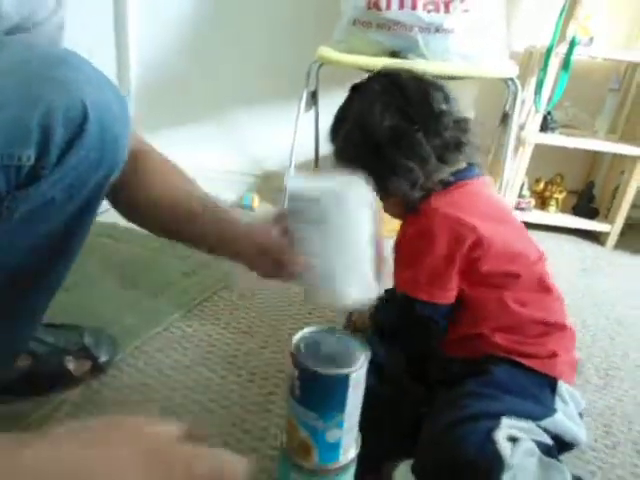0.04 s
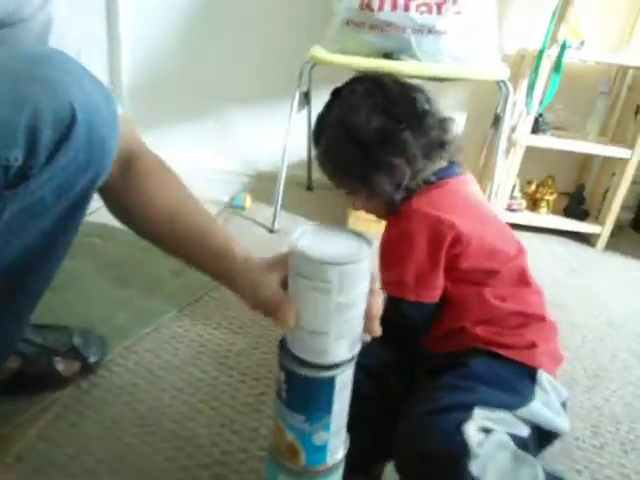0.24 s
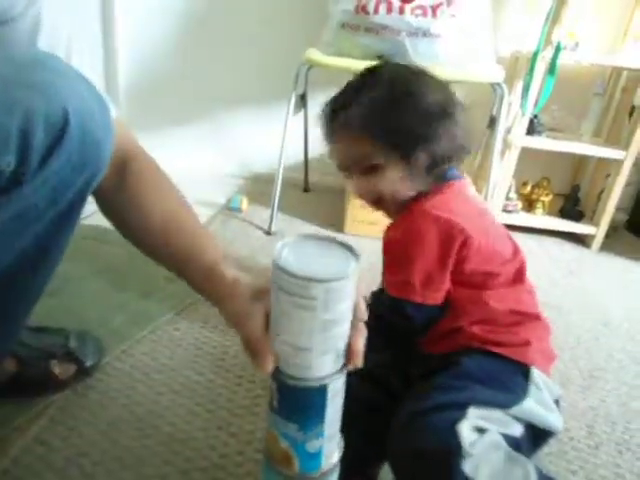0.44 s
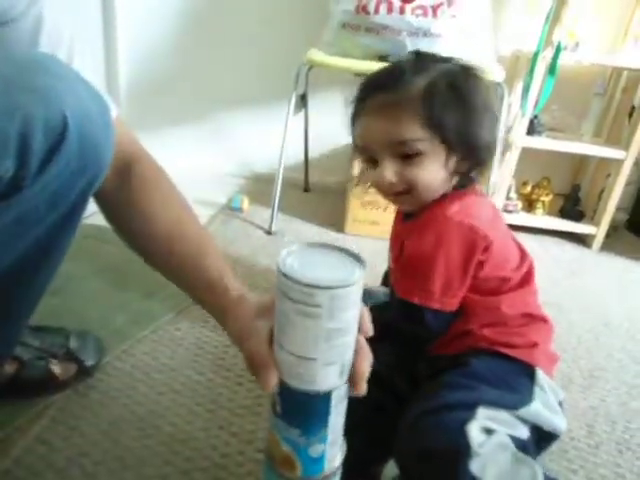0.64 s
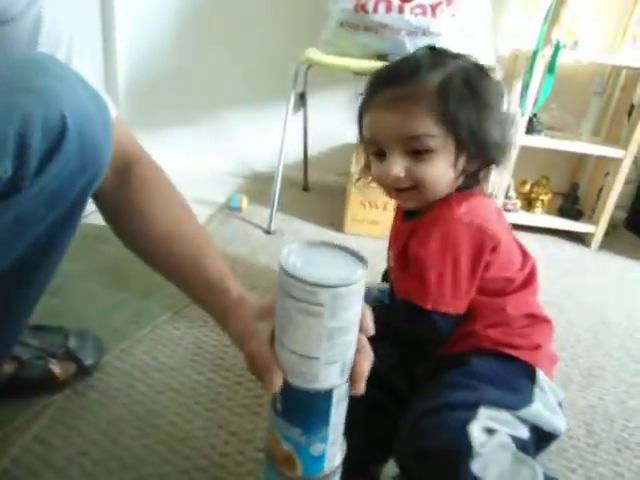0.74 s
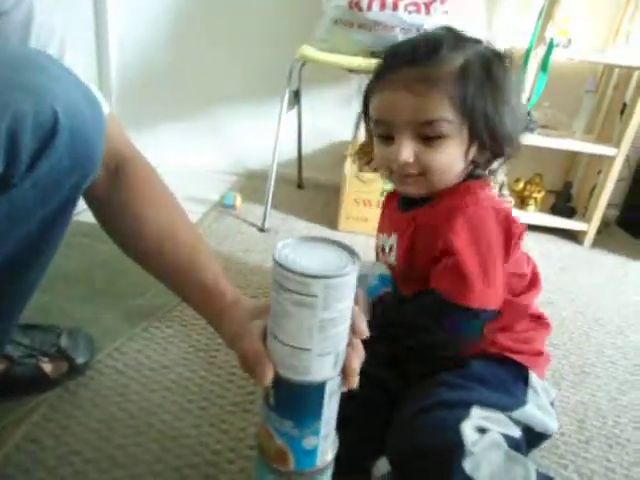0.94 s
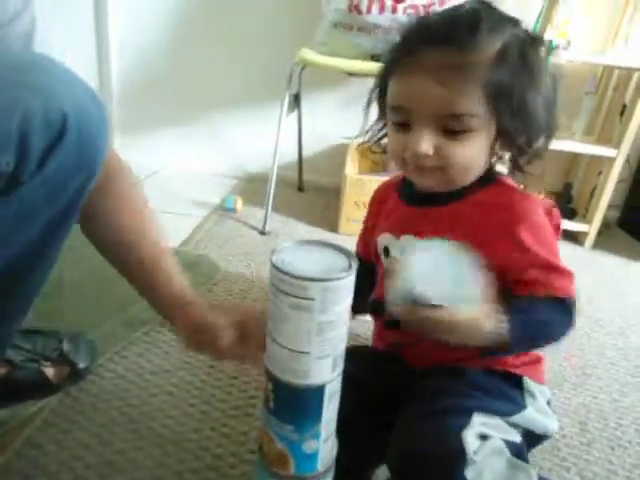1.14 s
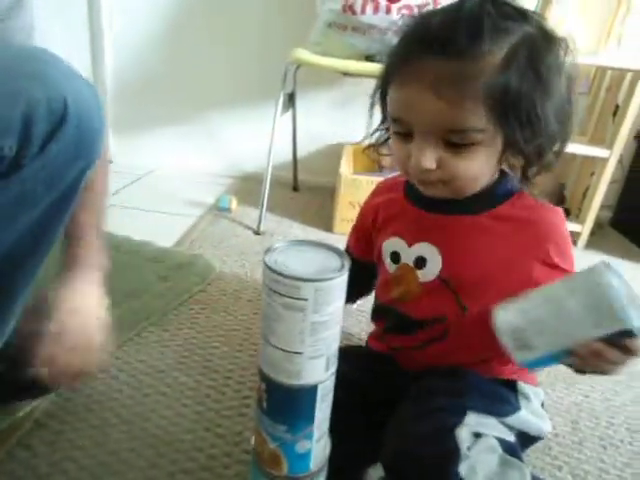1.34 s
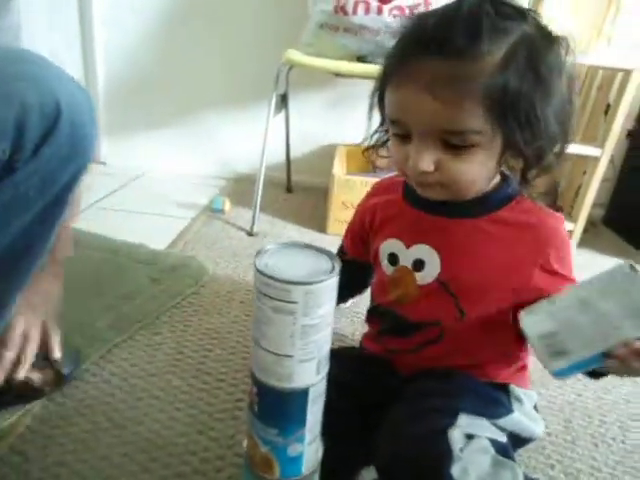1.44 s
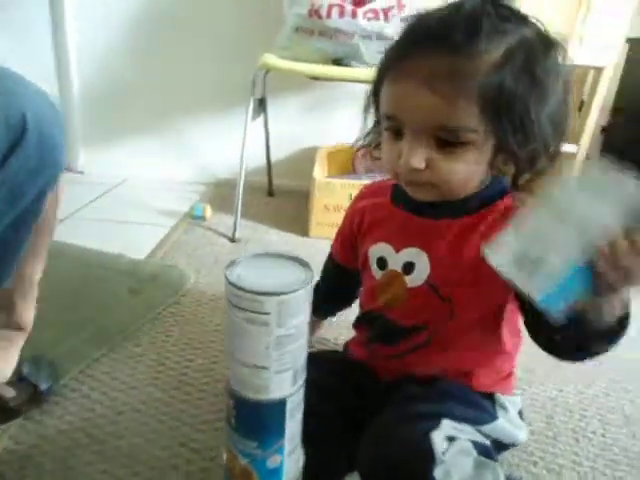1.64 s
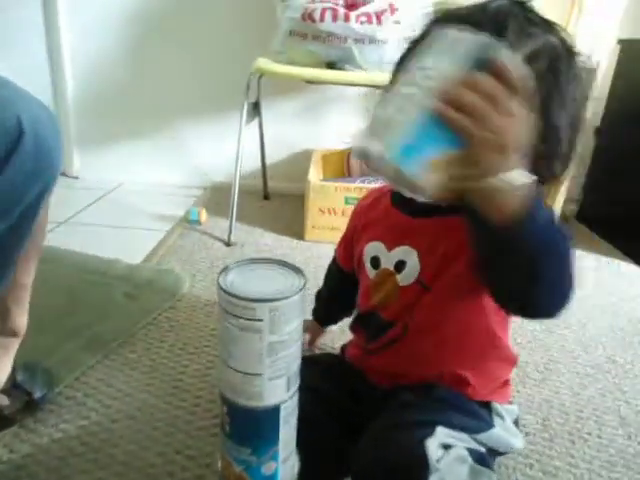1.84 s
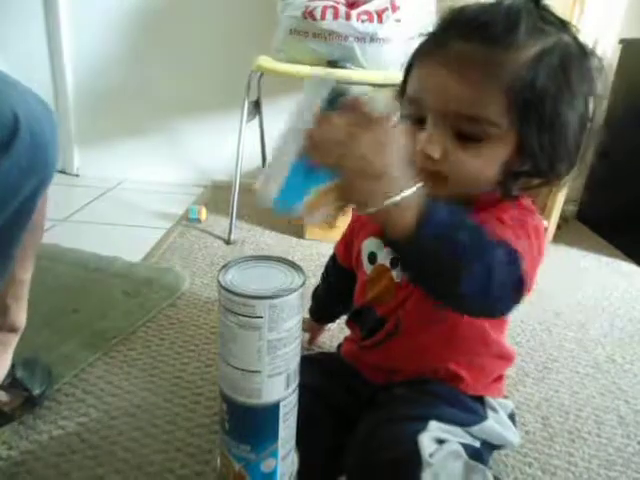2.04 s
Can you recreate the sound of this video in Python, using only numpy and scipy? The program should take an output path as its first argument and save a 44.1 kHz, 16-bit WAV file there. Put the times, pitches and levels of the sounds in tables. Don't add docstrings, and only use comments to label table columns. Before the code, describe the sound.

Tin can set hard on tin can: one clanking blow, short rattle, dull settling knock, low hum

```python
import sys
import numpy as np
from scipy import signal
from scipy.fft import rfft, irfft
from scipy.io import wavfile
from scipy.ndimage import uniform_filter1d

SR = 44100
rng = np.random.default_rng(int(sys.argv[2]) if len(sys.argv) > 2 else 0)


def int16_out(signal):
    q = np.round(np.clip(np.atleast_2d(signal).T, -1, 1) * 32767)
    wavfile.write(sys.argv[1], SR, q.astype(np.int16))


def gain_from_db(level_db):
    decades = np.asarray(level_db, float) / 20
    return 10 ** decades


N = 92610


def evened(x):
    return x / np.sqrt(np.mean(x ** 2) + 1e-20)


def read(points, hz):
    f, value = np.transpose(points)
    return np.interp(np.log(hz + 1), np.log(f + 1), value)


def add(mix, s, sound):
    part = mix[round(s * SR):][:len(sound)]
    part += sound[:len(part)]


def resonate(x, hz, width):
    r = np.exp(-np.pi * width / SR)
    c = r * np.cos(2 * np.pi * hz / SR)
    return 2 * (1 - r) * signal.lfilter([1, -c], [1, -2 * c, r * r], x + 1e-18)


def coloured(points, patchy_db):
    spectrum = rfft(rng.standard_normal(N)) * gain_from_db(read(points, np.fft.rfftfreq(N, 1 / SR)))
    s = signal.stft(irfft(spectrum, N), nperseg=1024)[2]
    patches = uniform_filter1d(rng.standard_normal(s.shape), 10, 0)
    patches = evened(uniform_filter1d(patches, 5, 1))
    return evened(signal.istft(s * gain_from_db(patchy_db * patches), nperseg=1024)[1][:N])


def choke(s, t60):
    return gain_from_db(np.clip(-60 * (np.arange(N) / SR - s) / max(t60, 1e-3), -120, 0))


def can(blows, modes, crack_t60, width, snap_db, haze_db, haze_t60, wobble):
    wobble_per_s = 70
    t = np.arange(SR // 3) / SR
    ring, crack = np.zeros(N), np.zeros(N)
    snap = np.array([.2, .5, .5, .2, -.2, -.3, -.3, -.2, -.2, -.1, -.1])
    for s, ring_db, crack_db, crack_hz in blows:
        for hz, db, t60 in modes:
            spot, a, b = rng.standard_normal((3, 64))
            sway = np.interp(t * wobble_per_s, np.arange(64), 1 - wobble + wobble * (a + 1j * b))
            tone = (sway * np.exp(2j * np.pi * hz * t)).imag
            level = gain_from_db(ring_db + db + 2.67 * spot[1] - 60 * t / max(t60, 1e-3))
            add(ring, s, np.sign(spot[0]) * level * tone)
        fade = gain_from_db(-60 * t / max(crack_t60, 1e-3)) + gain_from_db(haze_db - 60 * t / max(haze_t60, 1e-3))
        push = rng.standard_normal(len(t)) * fade
        push[0] = 3
        wide = max(1.5 * width * crack_hz, 20)
        noise = resonate(resonate(push, crack_hz, wide), crack_hz, wide)
        add(crack, s, gain_from_db(crack_db) * noise / np.sqrt(np.pi * wide / SR))
        add(crack, s, gain_from_db(crack_db + snap_db) * snap)
    return ring, crack


def appliance_hum():
    # frequency in Hz, width in Hz, level in dB
    hum_tones = [(57.7, 7, -45.5), (124.4, 7, -47.5), (142.93, 1.2, -39), (310, 6, -70), (375, 0.87, -59.5)]
    hum = np.zeros(N)
    for hz, width, db in hum_tones:
        tone = resonate(resonate(rng.standard_normal(2 * N), hz, width), hz, width)
        hum += gain_from_db(db) * evened(tone[N:])
    return hum


def room_air():
    # frequency in Hz, level in dB per Hz
    air_spectrum = [(2.4, -11), (4.0, 8.5), (35, -7), (65, -0.5), (91, -4.5), (135, -2), (172, -13.5),
                    (214, -16.5), (4560, -44), (6000, -59.5), (7800, -79.5), (13200, -120)]
    return gain_from_db(-35.5) * coloured(air_spectrum, patchy_db=1.27)


def cloth_rustle():
    # frequency in Hz, level in dB per Hz
    cloth_spectrum = [(800, -10), (2000, -4), (3200, 0), (4300, 1), (5200, -3), (6000, -8)]
    # time in seconds, level in dB
    motion = [(0.0, -47.5), (0.24, -55.5), (0.36, -41), (0.53, -55.5), (0.71, -46), (0.79, -59.5),
              (1.08, -63), (1.25, -53), (1.3, -49.5), (1.36, -50.5), (1.4, -53.5), (1.5, -48),
              (1.58, -47.5), (1.65, -45), (1.71, -58.5), (1.91, -63), (2.1, -66)]
    s, db = np.transpose(motion)
    return coloured(cloth_spectrum, patchy_db=4.0) * gain_from_db(np.interp(np.arange(N) / SR, s, db))


def room(x):
    # frequency in Hz, t60 in seconds
    decay = [(200, .4), (700, 0.35), (1500, 0.49), (3000, 0.2), (5500, 0.35)]
    taps = np.zeros(SR // 2)
    at = np.arange(200, SR // 2 - 20, 20)
    taps[at + rng.integers(0, 20, at.shape)] = rng.choice([-1., 1.], at.shape)
    hz, t, z = signal.stft(taps, SR, nperseg=256)
    tail = signal.istft(z * gain_from_db(-60 * t / read(decay, hz)[:, None]), SR, nperseg=256)[1]
    return signal.fftconvolve(x, tail / np.linalg.norm(tail))[:N]


def small_ticks():
    # start in seconds, ring in dB, crack in dB, crack pitch in Hz
    taps = [(.0468, -51.5, -34, 2380), (.1526, -46, -23.5, 1185), (.4665, -38, -31, 2960),
            (.4795, -33, -36, 4000), (.5125, -45.5, -28.5, 2470), (.5160, -33, -26, 4270),
            (.5420, -41.5, -38, 3980), (.6805, -45, -31, 3500), (.7158, -36.5, -25, 3650),
            (.7203, -29.5, -32, 3350), (.7800, -46, -46, 4400), (.8135, -40.5, -38.5, 2190),
            (.9830, -47, -26, 800), (.9960, -59.5, -27, 708), (1.0150, -54, -32, 1980),
            (1.1169, -62, -38.5, 2910), (1.2150, -68, -38.5, 1500), (1.3115, -62, -21.5, 2130),
            (1.3400, -66, -36, 4000), (1.4335, -63.5, -30, 4500), (1.4950, -73, -40.5, 1200),
            (1.5850, -51, -29, 570), (1.6080, -53.5, -28, 1300), (1.8100, -60, -32.5, 600),
            (1.8200, -61, -35.5, 2250)]
    # frequency in Hz, level in dB, t60 in seconds
    lid_modes = [(1330, 3, 0.061), (1970, -6, 0.05), (5130, -12.5, 0.029)]
    # crack t60 in s, crack width share, snap in dB, haze in dB, haze t60 in s, wobble
    touch = (.001, .3, -7, -32, .05, .6)
    return sum(can(taps, lid_modes, *touch))


def seating():
    # start in seconds, ring in dB, crack in dB, crack pitch in Hz
    knocks = [
        (.6243, -11.5, -6, 903),
        (.6262, -23, -23, 3800),
        (.6310, -18.5, -19, 750),
        (.6365, -16, -17, 800),
        (.6490, -13, -20, 1950),
        (.6560, -19, -28, 1920),
        (.6600, -19.5, -22.5, 600),
        (.6715, -25.5, -29, 900),
        (.6900, -20, -29.5, 1900),
    ]
    # frequency in Hz, level in dB, t60 in seconds
    seated_modes = [(426.3, -7, .12), (397, -2, 0.13), (641, -0.5, 0.1), (661, -8, 0.2), (800, -15, 0.028),
                    (990, -7, 0.038), (1078, -1.5, 0.13), (1184, -17.5, 0.068), (1328, -2, 0.16),
                    (1888, -14.5, 0.11), (1920, -2.5, 0.09), (2800, -12.5, 0.057), (3300, -24.5, 0.044),
                    (4760, -35, 0.044)]
    # crack t60 in s, crack width share, snap in dB, haze in dB, haze t60 in s, wobble
    touch = (.02, .4, -12, -23, .15, .6)
    ring, crack = can(knocks, seated_modes, *touch)
    press = np.maximum(choke(s=0.640, t60=.03), gain_from_db(-10))
    return crack + ring * press


def rim_slide():
    start_s, end_s, rise_s = .593, .623, .017
    slips_per_s, slide_db = 8200, -23.5
    # frequency in Hz, width in Hz, level in dB
    scrape_bands = [(1324, 36, 1), (1043, 200, -27), (2080, 110, -20.5), (5023, 280, -32.5),
                    (3500, 3300, -29)]
    t = np.arange(N) / SR
    slips = rng.standard_normal(N) * (rng.random(N) < slips_per_s / SR)
    push = slips * np.clip((t - start_s) / rise_s, 0, 1) * (t < end_s)
    out = np.zeros(N)
    for hz, width, db in scrape_bands:
        steady = resonate(slips, hz, width).std()
        out += gain_from_db(slide_db + db) * resonate(push, hz, width) / steady
    return out


def rim_rattle():
    # start in seconds, ring in dB, crack in dB, crack pitch in Hz
    chatter = [(.3471, -30, -21, 3400), (.3480, -34, -22, 4600), (.3490, -27.5, -22, 2250),
               (.3572, -17.5, -22, 4000), (.3595, -14.5, -22.5, 5000), (.3630, -16.5, -26, 2800),
               (.3670, -14.5, -22, 1100), (.3748, -18, -32, 4970), (.3790, -30.5, -29, 5000),
               (.3845, -32.5, -29.5, 5000), (.3890, -33, -33, 3900), (.3935, -24, -29, 1400),
               (.4000, -26, -23, 2200), (.4090, -27.5, -32, 2100), (.4160, -36, -41.5, 2730),
               (.4262, -29.5, -35.5, 1400)]
    # frequency in Hz, level in dB, t60 in seconds
    rim_modes = [(682, -10.5, 0.061), (1105, -2, 0.026), (1202, -3.5, 0.082), (1360, -3.5, 0.094),
                 (1520, -23.5, 0.15), (2140, -11.5, 0.11), (2696, -18, 0.12), (3305, -24, 0.091),
                 (3880, -28.5, 0.14), (4980, -21.5, 0.03)]
    # crack t60 in s, crack width share, snap in dB, haze in dB, haze t60 in s, wobble
    touch = (.028, .08, -6, -20, .14, .35)
    return sum(can(chatter, rim_modes, *touch))


def wall_ring():
    # start in seconds, ring in dB, crack in dB, crack pitch in Hz
    wall_knock = [
        (.2293, -14, -32.5, 2800),
    ]
    # frequency in Hz, level in dB, t60 in seconds
    wall_mode = [(2791, 0, .6)]
    # crack t60 in s, crack width share, snap in dB, haze in dB, haze t60 in s, wobble
    touch = (1, -1.5, -9.5, -18.5, 3.5, -0.38)
    return sum(can(wall_knock, wall_mode, *touch)) * choke(s=0.347, t60=0.008)


def rebound():
    # start in seconds, ring in dB, crack in dB, crack pitch in Hz
    bounces = [
        (.2295, -7, -14.5, 3000),
        (.2330, -7.5, -15.5, 550.3),
        (.2390, -14, -20, 600),
        (.2460, -11.5, -18.5, 1500),
        (.2620, -16.5, -23, 1800),
        (.2760, -16, -25.5, 1400),
    ]
    # frequency in Hz, level in dB, t60 in seconds
    free_modes = [(507, -8.5, 0.14), (546, -9.5, 0.033), (600, -11.5, 0.13), (1036, -23, 0.1),
                  (1255, -15, 0.18), (1297, -6.5, 0.27), (1331.6, 0, .22), (1410, -12, 0.15),
                  (1462, -3, 0.087), (1560, -15, .07), (1680, -18, .1), (1880, -14, 0.2), (3700, -26, .15),
                  (4180, -28.5, .12)]
    # crack t60 in s, crack width share, snap in dB, haze in dB, haze t60 in s, wobble
    touch = (-0.0864, -1.3, -11, -19.5, 0.58, -0.23)
    return sum(can(bounces, free_modes, *touch))


def blow():
    # start in seconds, ring in dB, crack in dB, crack pitch in Hz
    strikes = [
        (.2012, 8.5, 2.5, 600),
        (.2030, -27.5, -15.5, 3000),
        (0.2135, -15.5, -7, 2500),
        (.2200, -2, -13.5, 4000),
    ]
    # frequency in Hz, level in dB, t60 in seconds
    struck_modes = [(507.8, -19, 0.18), (628, -16, 0.094), (1231, -8.5, .05), (1316.8, -2.5, 0.2),
                    (1487, -2, 0.23), (1641.5, -14, 0.068), (2320, -21.5, 0.076), (2660, -19, .08),
                    (2797, -17, 0.13), (2985, -21, 0.045), (4333, -19, .1), (4560, -19.5, .1),
                    (5170, -21.5, 0.2)]
    # crack t60 in s, crack width share, snap in dB, haze in dB, haze t60 in s, wobble
    touch = (0.0172, 0.9, 1.5, -21.5, 0.59, -0.02)
    ring, crack = can(strikes, struck_modes, *touch)
    out = ring * choke(s=0.224, t60=0.036) + crack
    thump_db, thump_hz, thump_t60 = -12, 85, .1
    t = np.arange(8000) / SR
    thump = gain_from_db(thump_db - 60 * t / thump_t60) * np.sin(2 * np.pi * thump_hz * t)
    add(out, strikes[0][0], thump)
    return out


def scene():
    near = blow() + rebound() + wall_ring() + seating() + rim_rattle() + small_ticks() + rim_slide()
    reflections = gain_from_db(-19) * room(near)
    background = appliance_hum() + cloth_rustle() + room_air()
    return (near + reflections + background)[None]


def smooth(x, taps):
    return signal.oaconvolve(np.pad(x, ((0, 0), (200, 200))), taps[None], "valid")


def band_limit(x):
    return signal.sosfilt(signal.butter(12, 16190, fs=SR, output="sos"), x)


def record(dry):
    input_top, output_top = .73, 0.71
    edge, skirt, final = [signal.firwin(401, hz, window=("kaiser", 11), fs=SR) for hz in (5252, 6000, 16150)]
    raising = edge + gain_from_db(-19) * (skirt - edge)
    clipped = np.clip(smooth(dry, skirt), -input_top, input_top)
    slow = clipped * 4 * (np.arange(N) % 4 == 0)
    raised = np.clip(smooth(slow, raising), -output_top, output_top)
    return band_limit(smooth(raised, final))


dry = scene()
out = record(dry)
int16_out(out)
```